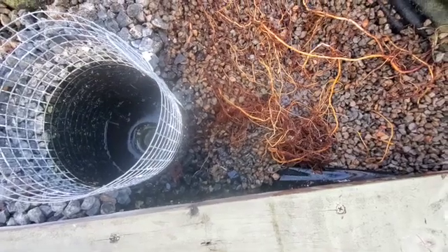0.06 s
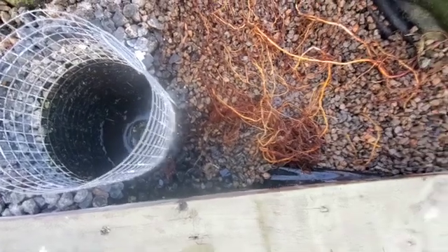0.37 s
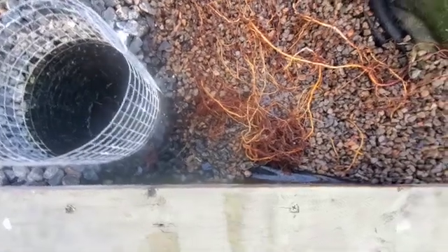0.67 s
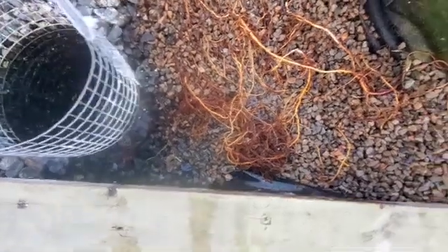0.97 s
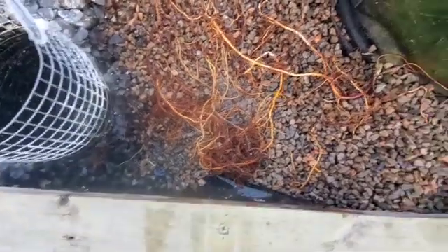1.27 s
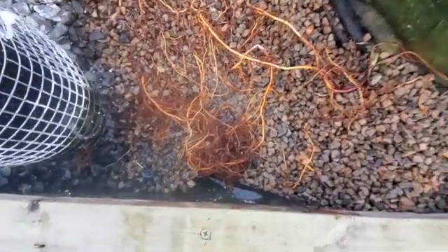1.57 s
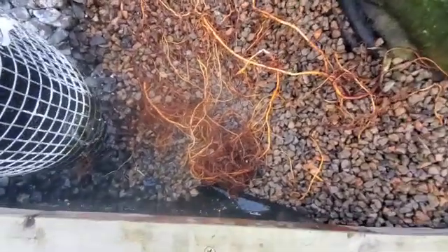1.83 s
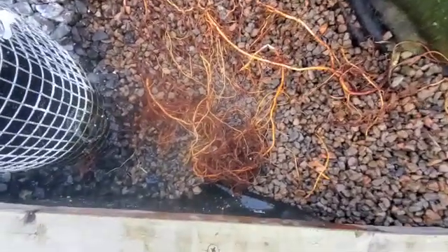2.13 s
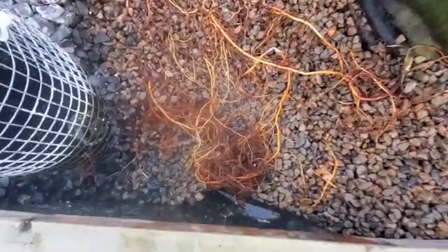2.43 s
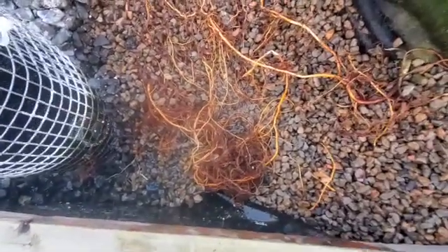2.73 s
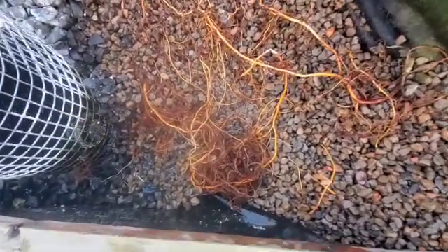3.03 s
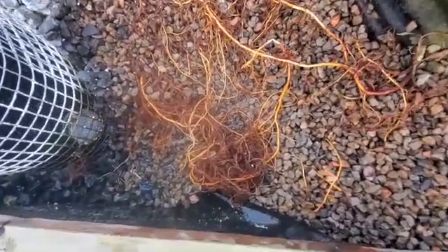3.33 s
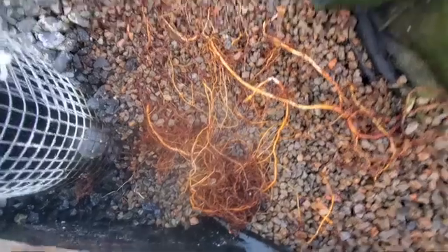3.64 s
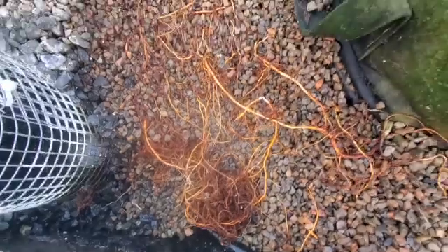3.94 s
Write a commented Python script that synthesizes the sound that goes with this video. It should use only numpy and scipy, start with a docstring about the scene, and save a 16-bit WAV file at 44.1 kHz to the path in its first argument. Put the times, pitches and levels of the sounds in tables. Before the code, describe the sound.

Deep, hollow gurgling of water in a drain pipe dies away, leaving a quiet trickle.

```python
"""Deep glugs and small plops ring in a pipe, with spits of spray: a siphon finishes draining a gravel
grow bed, heard from just above its standpipe. Big air pockets glug through the water, smaller ones
burst, and both make the pipe ring. The gurgle dies away in two seconds, its last note climbing as
water closes the air space, and leaves a bubbly trickle over a low outdoor rumble."""
import sys
import numpy as np
from scipy import signal
from scipy.fft import rfft, irfft, next_fast_len
from scipy.io import wavfile
from scipy.ndimage import uniform_filter1d, minimum_filter1d, map_coordinates

SR = 44100
rng = np.random.default_rng(int(sys.argv[2]) if len(sys.argv) > 2 else 0)


def dump_mix(stems):
    """Bounce the given channels to the path in sys.argv[1] as a 16-bit WAV at rate SR."""
    frames = np.atleast_2d(stems).T  # one column per channel
    limited = np.clip(frames, -1, 1)  # hard clip at full scale
    pcm = np.round(limited * 32767).astype(np.int16)
    wavfile.write(sys.argv[1], SR, pcm)


N = 176400  # 4 seconds

# big air pockets (peak time [s], level [dB], pitch [Hz], swell time [s])
GLUGS = [(.056, -5, 291, 0.005), (0.072, -12.5, 223, 0.0075), (.099, -7.5, 276, 0.0029),
         (0.112, -14, 243, 0.005), (0.157, -16, 315, 0.01), (0.23, -16, 290, 0.002),
         (.260, -6, 285, 0.0022), (0.274, -11, 242, 0.0065), (0.289, -10.5, 250, 0.0055),
         (.299, -13, 306, .005), (.312, -14, 322, 0.007), (.338, -6.5, 307, 0.0029),
         (0.355, -17, 380, 0.0024), (.396, -13.5, 297, 0.0038), (0.43, -15, 248, 0.0038),
         (0.505, 0.5, 258, 0.0059), (.520, -10.5, 308, 0.0073), (0.608, -7, 315, 0.0015),
         (.645, -6, 312, 0.0032), (.676, -3.5, 262, 0.0025), (0.694, -8, 288, 0.006),
         (0.706, -13.5, 306, 0.0016), (.740, -20, 433, 0.0042), (.762, -18, 327, 0.004),
         (0.794, -11.5, 350, 0.0043), (.840, -14, 353, 0.0015), (0.861, -4, 246, 0.0033),
         (0.894, -9, 270, 0.0018), (0.927, -16.5, 305, 0.0074), (0.987, -6.5, 252, 0.0021),
         (1.081, -13.5, 337, 0.00057), (1.096, -10, 235, 0.0058), (1.107, -4.5, 247, 0.0045),
         (1.216, -20, 177, 0.015), (1.228, -8, 278, 0.0043), (1.243, -16, 206, 0.0057),
         (1.263, -9.5, 246, 0.0027), (1.296, -11.5, 226, 0.0078), (1.351, -16, 267, 0.00084),
         (1.392, -10.5, 289, 0.0094), (1.405, -10.5, 307, 0.0024), (1.426, -17, 275, 0.015),
         (1.45, -18, 320, 0.00057), (1.561, -23, 262, 0.012), (1.709, -22.5, 297, 0.0033),
         (1.808, -22, 322, 0.0022), (1.878, -25.5, 300, 0.0023)]
GLUG_TRIM_DB, GLUG_T60_S = -1, 0.035  # a trim shifts every level; T60 is the time to fade by 60 dB
GLUG_SAG, SAG_S = 0.17, 0.0068  # the pitch slides from this share above to this share below; how fast


def glugs():
    """Each big air pocket swells, sags in pitch and dies within a few cycles."""
    out, t = np.zeros(N), np.arange(-SR // 40, SR // 8) / SR
    for s, db, hz, swell in GLUGS:
        phase = 2 * np.pi * hz * (t - GLUG_SAG * SAG_S * np.log(np.cosh(t / SAG_S)))
        add(out, s + t[0], amp(db + GLUG_TRIM_DB) * burst(t, swell, GLUG_T60_S) * np.cos(phase))
    return out


# deep thumps behind some big pockets (peak time [s], level [dB])
THUMPS = [(.278, -18), (0.504, -19), (.69, -28.5)]
THUMP_HZ = 131


def thumps():
    """The water in the pipe drops back with a short, deep push."""
    out, t = np.zeros(N), np.arange(-SR // 40, SR // 8) / SR
    for s, db in THUMPS:
        envelope = amp(db) * burst(t, swell_s=0.0055, t60_s=0.06)
        add(out, s + t[0], envelope * np.sin(2 * np.pi * THUMP_HZ * t))
    return out


# smaller air pockets (peak time [s], level [dB], pitch [Hz])
PLOPS = [(0.078, -20, 1194), (0.229, -22.5, 920), (0.257, -15.5, 902), (0.281, -18, 1015),
         (.338, -19, 1034), (0.35, -24, 1094), (.419, -24, 1170), (0.503, -12.5, 983), (0.605, -25.5, 1020),
         (0.634, -16, 950), (.658, -21.5, 1046), (.673, -28, 980), (.707, -33, 1030), (.738, -22.5, 1120),
         (0.759, -22, 1110), (0.79, -22.5, 1235), (.839, -28, 1020), (0.857, -16.5, 1190), (.890, -21, 985),
         (0.926, -17.5, 1040), (0.98, -22.5, 940), (1.102, -30, 1276), (1.121, -27, 1190),
         (1.225, -21, 1040), (1.247, -20.5, 1234), (1.289, -22.5, 1082), (1.426, -30, 830),
         (1.449, -32, 890)]
# colour of a pop: how strong its lows and highs are (frequency [Hz], level [dB])
POP_COLOUR = [(300, -20), (620, -5), (950, 0.5), (1300, -6), (2000, -16), (5000, -34)]
RING_TRIM_DB, POP_TRIM_DB = -2, -7
PLOP_SWELL_S, RING_T60_S, POP_T60_S, PLOP_RISE = 0.0011, 0.037, 0.034, 0.017


def plops():
    """Each small pocket bursts with a rough pop and a short rising ring."""
    rings, pops, t = np.zeros(N), np.zeros(N), np.arange(-SR // 100, SR // 10) / SR
    for s, db, hz in PLOPS:
        phase = 2 * np.pi * hz * (t + PLOP_RISE * t * t / RING_T60_S)
        add(rings, s + t[0], amp(db + RING_TRIM_DB) * burst(t, PLOP_SWELL_S, RING_T60_S) * np.sin(phase))
        add(pops, s + t[0], amp(db + POP_TRIM_DB) * burst(t, PLOP_SWELL_S, POP_T60_S))
    return rings + pops * coloured(rng.standard_normal(N), POP_COLOUR)


# churning between the glugs (time [s], level [dB])
CHURN_LEVELS = [(0, -32.5), (.2, -40.5), (.3, -34.5), (.59, -38), (.7, -29.5), (.93, -37.5), (1.3, -45.5),
                (1.55, -43), (1.85, -49.5), (2.3, -80)]
# colour of the churning (frequency [Hz], level [dB])
CHURN_COLOUR = [(40, -41), (90, -18), (140, -19.5), (200, -3.5), (400, -3.5), (540, -5.5), (780, -12),
                (1080, -0.5), (1500, -15), (2500, -4), (5000, -53)]
CHURN_TRIM_DB, WAKE_DB, WAKE_T60_S = 4.5, -16.5, 0.042  # a wake is the bubble cloud behind a glug


def churn():
    """Weak bubbles crowd between the glugs, thickest just behind each, and stop as the siphon empties."""
    swarm = bubbles(per_s=390, low_hz=89, high_hz=1860, cycles=9.6, spread_db=0.84, rise=0.11)[0]
    power = (amp(CHURN_TRIM_DB) * level(CHURN_LEVELS)) ** 2
    t = np.arange(SR // 4) / SR
    for s, db, _, swell in GLUGS:
        wake = amp(db + WAKE_DB) * burst(t - swell, swell / 2, WAKE_T60_S)
        add(power, s, wake ** 2)
    return np.sqrt(power) * coloured(swarm, CHURN_COLOUR)


# the pipe's low, middle and high notes (width [Hz], gain [dB])
PIPE_NOTES = [(32, -0.5), (41.5, 5.5), (32.7, 4)]
# the low note shifts as the water heaves and settles (time [s], pitch [Hz])
PIPE_LOW = [(.6, 215), (1.25, 209), (1.45, 245), (1.7, 290)]
# so does the high note (time [s], pitch [Hz])
PIPE_HIGH = [(.08, 1086), (.26, 945), (.4, 1044), (.68, 1010), (.8, 1057), (.97, 1002), (1.1, 1226),
             (1.26, 1210), (1.43, 900)]
# where the gurgle sits (frequency [Hz], left minus right [dB])
GURGLE_PAN = [(60, 0), (160, 3), (270, 5), (450, 9.5), (740, 21.5), (1200, 9), (2000, 17), (3300, -1)]
PIPE_MIDDLE_HZ, LOW_CUT_HZ, ECHO_T60_S, ECHO_DB = 384, 46, 0.098, -13


def standpipe(gurgle):
    """The pipe, off to the left, rings with the gurgle, and its well scatters a short echo."""
    pitches = glide(PIPE_LOW), PIPE_MIDDLE_HZ, glide(PIPE_HIGH)
    ringing = sum(amp(db) * resonance(gurgle, hz, width) for hz, (width, db) in zip(pitches, PIPE_NOTES))
    # the deepest bass is cut from the gurgle
    direct = filtered(gurgle + ringing, lambda hz: hz ** 2 / (hz ** 2 + LOW_CUT_HZ ** 2))
    t = np.arange(SR // 4) / SR
    tail = rng.standard_normal((2, len(t))) * burst(t, 1, ECHO_T60_S)
    echo = signal.fftconvolve(direct[None], tail / np.linalg.norm(tail[0]), axes=1)[:, :N]
    return panned(left_first(direct, lead_s=0.00015) + amp(ECHO_DB) * echo, GURGLE_PAN)


# the note of the last gurgling (time [s], pitch [Hz], level [dB])
CLOSING_NOTE = [(1.45, 300, -49), (1.648, 330, -36.5), (1.88, 400, -43), (2.0, 460, -39),
                (2.08, 610, -43.5), (2.22, 650, -52), (2.299, 610, -47), (2.43, 590, -54)]
CLOSING_WIDTH_HZ = 100


def closing_note():
    """Churning noise rings in a shrinking air space, so its hollow note climbs."""
    s, hz, db = np.transpose(CLOSING_NOTE)
    t = np.arange(N) / SR
    phase = 2 * np.pi * np.cumsum(np.interp(t, s, hz)) / SR
    ring = wobble(CLOSING_WIDTH_HZ) * np.cos(phase) + wobble(CLOSING_WIDTH_HZ) * np.sin(phase)
    envelope = amp(np.interp(t, s, db, left=-120, right=-120))
    return panned(unit(ring) * envelope, GURGLE_PAN)


# the ongoing fizz (time [s], level [dB])
FIZZ_LEVELS = [(0, -43), (.3, -42), (.5, -43.5), (.68, -43.5), (1.05, -48), (1.35, -49), (1.7, -46.5),
               (1.92, -44.5), (2.37, -50.5), (2.7, -49.5), (2.93, -45.5), (3.1, -51), (4, -50.5)]
# colour of the fizz (frequency [Hz], level [dB])
FIZZ_COLOUR = [(1500, -39), (3000, -1.5), (4500, -7), (5700, 1), (6600, 0.5), (7400, 2), (8200, -6.5),
               (9200, -14.5), (12000, -2.5), (14000, -4), (15500, -0.5)]
# spits of spray (peak time [s], level [dB], time to fade by 60 dB [s])
SPITS = [(0.062, -29.5, 0.023), (0.091, -26, 0.0099), (0.377, -31, 0.066), (.449, -29, 0.048),
         (0.573, -31, 0.012), (0.634, -34, 0.041), (0.7, -38, 0.034), (0.758, -36, 0.026),
         (0.891, -35, 0.11), (1.935, -36.5, 0.032), (3.292, -36.5, 0.16), (3.457, -39.5, 0.12)]
# colour of the spits (frequency [Hz], level [dB])
SPIT_COLOUR = [(700, -25), (1900, 7), (4500, -0.5), (5700, 1.5), (7400, 6.5), (9000, -8.5), (12000, 0),
               (15500, -17)]
# where the spray sits (frequency [Hz], left minus right [dB])
SPRAY_PAN = [(3000, 10), (5500, -3.5), (7500, -6.5), (10000, 5), (15000, 2.5)]
FIZZ_TRIM_DB, THIN_RING_DB = 2.5, -2


def spray():
    """Fine droplets fizz all along with a thin ring; now and then a spit stands out."""
    droplets = unit(bubbles(per_s=2100, low_hz=3100, high_hz=15900, cycles=27, spread_db=5.5, rise=0.028))
    fizz = coloured(droplets + 2 * patchy(depth_db=2, size=256), FIZZ_COLOUR)
    flicker_db = 1.46 * wobble(110) + 1.5 * wobble(18)
    fizz *= amp(FIZZ_TRIM_DB + flicker_db) * level(FIZZ_LEVELS)
    spits, t = np.zeros(N), np.arange(-SR // 100, SR // 5) / SR
    for s, db, t60 in SPITS:
        add(spits, s + t[0], amp(db) * burst(t, swell_s=0.0042, t60_s=t60))
    mist = fizz + spits * coloured(patchy(depth_db=2, size=256), SPIT_COLOUR)
    thin_ring = amp(THIN_RING_DB) * resonance(mist, hz=7376, width_hz=64)
    return panned(mist + thin_ring, SPRAY_PAN)


# the running water (time [s], level [dB])
TRICKLE_LEVELS = [(0, -38), (.3, -38.5), (.7, -43), (1.1, -43), (1.55, -43), (1.8, -42), (2.15, -41),
                  (2.25, -43), (2.32, -41), (2.4, -45), (2.95, -45), (3.22, -45.5), (4, -47.5)]
# colour of the trickle (frequency [Hz], level [dB])
TRICKLE_COLOUR = [(250, -4.5), (480, 1.5), (650, 1), (900, -2), (1300, 1), (1800, 1), (2400, -0.5),
                  (3300, -3), (5000, -11.5), (9000, -35)]
# where the trickle sits (frequency [Hz], left minus right [dB])
TRICKLE_PAN = [(400, 1.5), (800, 4.5), (2000, 5.5), (3500, -2)]
BUBBLES_DB, WASH_DB = -3, 0.5


def trickle():
    """Water runs on the left: small bubbles and drops ring over a soft wash of noise."""
    swarm = bubbles(per_s=600, low_hz=650, high_hz=4800, cycles=30, spread_db=1.6, rise=0.05)
    swarm = coloured(swarm, TRICKLE_COLOUR + [(12000, -60)])
    wash = coloured(rng.standard_normal(N) + 2 * patchy(depth_db=5, size=1024), TRICKLE_COLOUR)
    flicker = amp(1.66 * wobble(34.685))
    flow = level(TRICKLE_LEVELS) * flicker * (amp(BUBBLES_DB) * swarm + amp(WASH_DB) * wash)
    return panned(left_first(flow + drops(), lead_s=0.00046), TRICKLE_PAN)


# single drops (peak time [s], level [dB], pitch [Hz], swell time [s])
DROPS = [(1.969, -21.5, 1340, 0.0041), (2.115, -31, 1820, .008), (2.159, -22, 1884, 0.00086),
         (2.299, -29, 1644, 0.0059), (2.684, -27.5, 630, 0.0027), (2.797, -32.5, 2360, 0.0044),
         (2.954, -27.5, 1050, 0.0037), (3.215, -34.5, 410, 0.0037), (3.517, -34, 1680, 0.0084),
         (3.750, -33.5, 1670, .006)]
DROP_TRIM_DB, DROP_T60_S, DROP_ROUGHNESS_RAD = -0.5, 0.032, 0.39


def drops():
    """Single drops splash and ring briefly above the trickle."""
    out, t = np.zeros(N), np.arange(-SR // 100, SR // 8) / SR
    for s, db, hz, swell in DROPS:
        phase = 2 * np.pi * hz * t + DROP_ROUGHNESS_RAD * wobble(653)[:len(t)]
        add(out, s + t[0], amp(db + DROP_TRIM_DB) * burst(t, swell, DROP_T60_S) * np.sin(phase))
    return out


# faint notes in the trickle (start time [s], length [s], pitch [Hz], level [dB])
HOLLOW_TONES = [(2.134, 0.047, 669, -36.5), (2.291, 0.068, 690, -40.5), (2.54, 0.07, 298, -40.5),
                (2.798, 0.057, 590, -43), (3.008, 0.12, 641, -39.5)]
TONE_WAVER = 0.017  # share of the pitch


def hollow_tones():
    """Soft, unsteady notes swell and fade."""
    out, waver = np.zeros(N), 1 + TONE_WAVER * wobble(90)
    for s, length, hz, db in HOLLOW_TONES:
        n = int(length * SR)
        envelope = amp(db) * np.sin(np.linspace(0, np.pi, n))
        phase = 2 * np.pi * hz * np.cumsum(waver[int(s * SR):][:n]) / SR
        add(out, s, envelope * np.sin(phase))
    return panned(out, TRICKLE_PAN)


# colour of the outdoor background (frequency [Hz], level [dB])
RUMBLE_COLOUR = [(25, -35), (40, -12), (58, 1.5), (90, 0), (130, -11.5), (180, -4), (300, -7.5), (450, -32),
                 (800, -32), (2000, -47)]
RUMBLE_DB = -48.5


def rumble():
    """Low outdoor noise, nearly the same on both sides."""
    air = rng.standard_normal(N) + 0.28 * rng.standard_normal((2, N))
    return amp(RUMBLE_DB) * coloured(air, RUMBLE_COLOUR)


def bubbles(per_s, low_hz, high_hz, cycles, spread_db, rise):
    """A stereo swarm of ringing bubbles, each rising in pitch, each from its own place."""
    out = np.zeros((2, N))
    draws = np.random.default_rng(rng.integers(2 ** 30)).random((int(per_s * N / SR), 4))
    for when, pitch, size, place in draws:
        hz = low_hz * (high_hz / low_hz) ** pitch
        age = np.linspace(0, 1, int(cycles / hz * SR) + 2)
        side_shift = np.pi * (place - .5) * np.array([[1], [-1]])
        phase = 2 * np.pi * cycles * (age + rise * age * age / 2) + side_shift
        gain = amp(-spread_db * np.log(1 - .97 * size))  # many quiet, a few louder
        envelope = (1 - np.exp(-2 * age * cycles)) * np.exp(-np.log(100) * age)
        add(out, when * N / SR, gain * envelope * np.sin(phase))
    return out


def patchy(depth_db, size):
    """Stereo noise whose narrow bands flare and fade on their own."""
    bands = signal.stft(rng.standard_normal((2, N)), nperseg=size)[2]
    flare = uniform_filter1d(rng.standard_normal(bands.shape[1:]), size=4, axis=0)  # smooth over pitch
    flare = uniform_filter1d(flare, size=3, axis=1)  # and over time
    return unit(signal.istft(bands * amp(depth_db * unit(flare)), nperseg=size)[1][:, :N])


def resonance(x, hz, width_hz):
    """Let x ring at a pitch that may move, with gain 1 at that pitch."""
    turn = np.exp(2j * np.pi * np.cumsum(hz * np.ones(N)) / SR)
    keep = np.exp(-np.pi * abs(width_hz) / SR)
    return 2 * np.real(turn * signal.lfilter([1 - keep], [1, -keep], x / turn))


def burst(t, swell_s, t60_s):
    """A loudness curve that swells to its peak at t = 0, then dies."""
    return np.where(t < 0, np.exp(-(t / swell_s) ** 2), np.exp(-np.log(1000) * np.abs(t) / t60_s))


def amp(db):
    """Turn decibels into a gain."""
    return 10 ** (np.asarray(db) / 20)


def unit(x):
    """Scale x to an average power of 1."""
    return x / np.sqrt(np.mean(x ** 2) + 1e-20)


def glide(rows):
    """A value for each sample from (time [s], value) rows."""
    return np.interp(np.arange(N) / SR, *np.transpose(rows))


def level(rows):
    """A gain for each sample from (time [s], level [dB]) rows."""
    return amp(glide(rows))


def along(points, hz):
    """Read between (frequency [Hz], value) points on a log scale."""
    frequencies, values = np.transpose(points)
    return np.interp(np.log(hz + 1), np.log(frequencies + 1), values)


def wobble(per_s):
    """A smooth curve through per_s random points a second."""
    return map_coordinates(rng.standard_normal(int(N * per_s / SR) + 4), [np.arange(N) * per_s / SR])


def filtered(x, response):
    """Multiply each frequency in x by response(hz)."""
    size = next_fast_len(N + SR // 2)
    return irfft(rfft(x, size) * response(np.fft.rfftfreq(size, 1 / SR)), size)[..., :N]


def coloured(x, colour):
    """Shape the lows and highs of x, then scale it to power 1."""
    return unit(filtered(x, lambda hz: amp(along(colour, hz))))


def panned(x, pan):
    """Share each frequency between left and right."""
    def gains(hz):
        ratio = amp(along(pan, hz))
        return 2 * np.array([ratio, np.ones_like(ratio)]) / (1 + ratio)
    return filtered(x, gains)


def left_first(x, lead_s):
    """The left side hears x earlier than the right."""
    return filtered(x, lambda hz: np.exp(1j * np.pi * hz * lead_s * np.array([[1], [-1]])))


def add(track, s, sound):
    """Mix a sound into a track from time s."""
    start = max(round(s * SR), 0)
    part = track[..., start:start + sound.shape[-1]]
    part += sound[..., :part.shape[-1]]


def scene():
    """The gurgling pipe amid running water."""
    gurgle = glugs() + thumps() + plops() + churn()
    return standpipe(gurgle) + closing_note() + spray() + trickle() + hollow_tones() + rumble()


LIMITER_S, TOP_HZ = 0.0033, 16000


def record(dry):
    """A limiter turns the biggest glugs down to full scale, then the highest treble is cut."""
    n = int(LIMITER_S * SR)
    needed_gain = np.minimum(1, 1 / (np.abs(dry).max(axis=0) + 1e-9))
    smooth_gain = uniform_filter1d(minimum_filter1d(needed_gain, 2 * n), n)
    return filtered(dry * smooth_gain, lambda hz: hz < TOP_HZ)


dry = scene()
out = record(dry)
dump_mix(out)
```